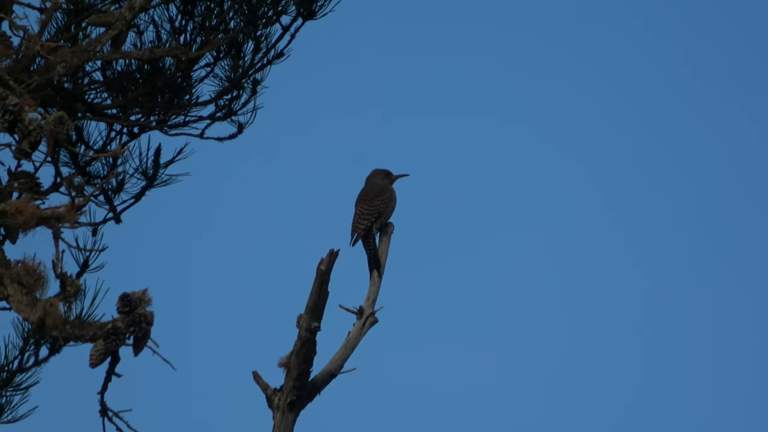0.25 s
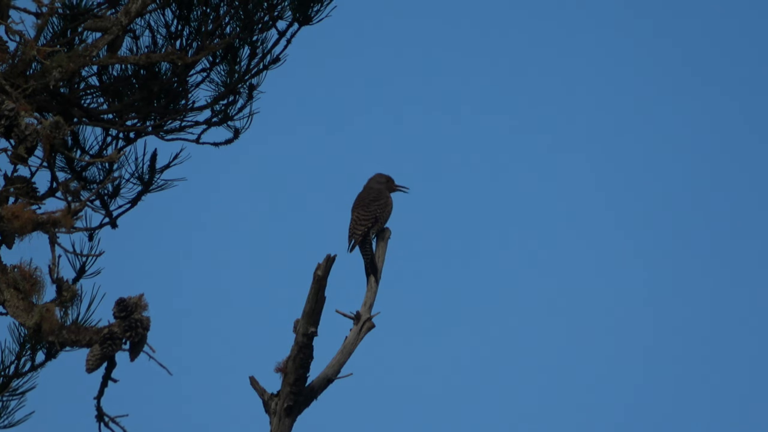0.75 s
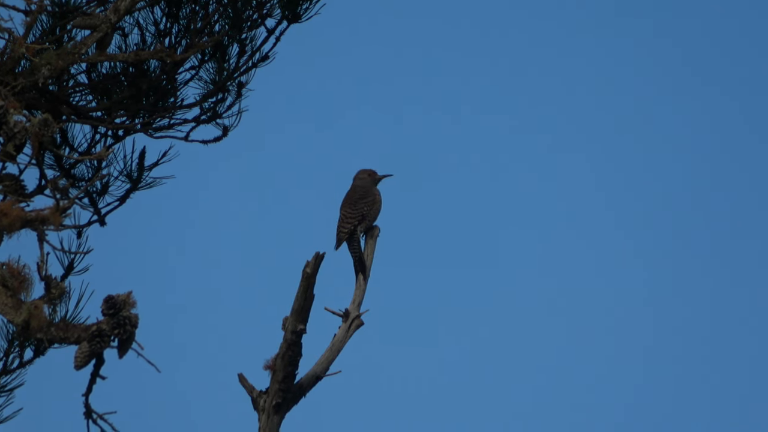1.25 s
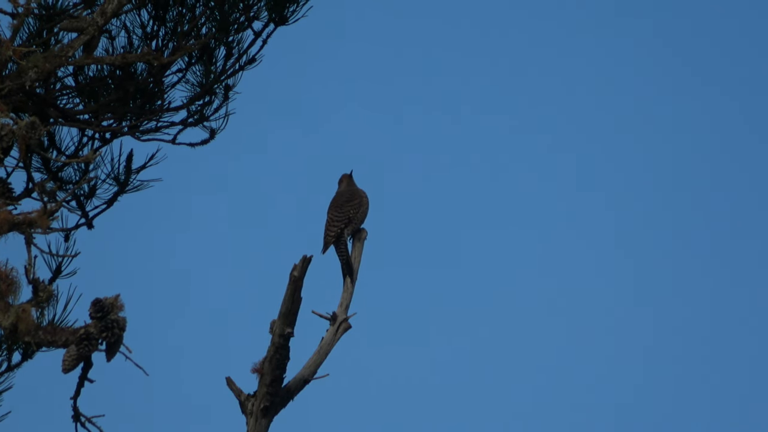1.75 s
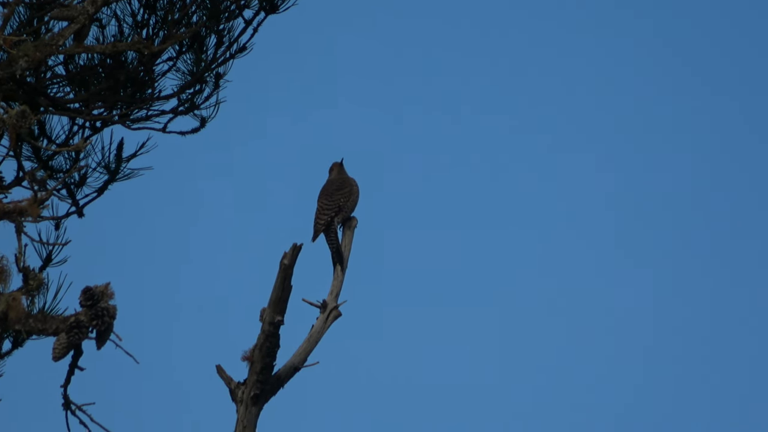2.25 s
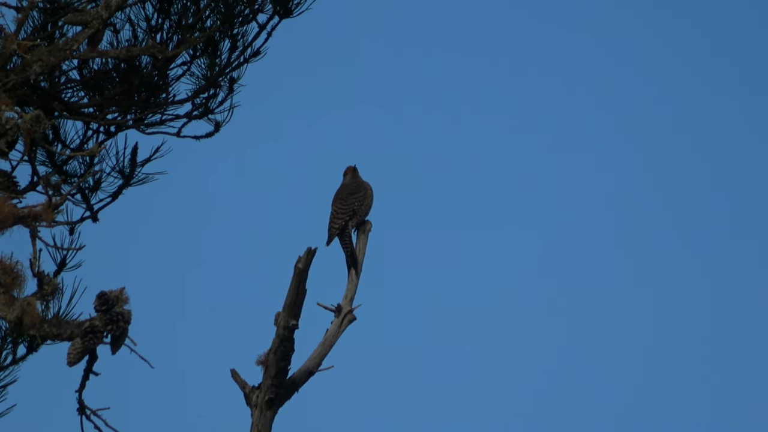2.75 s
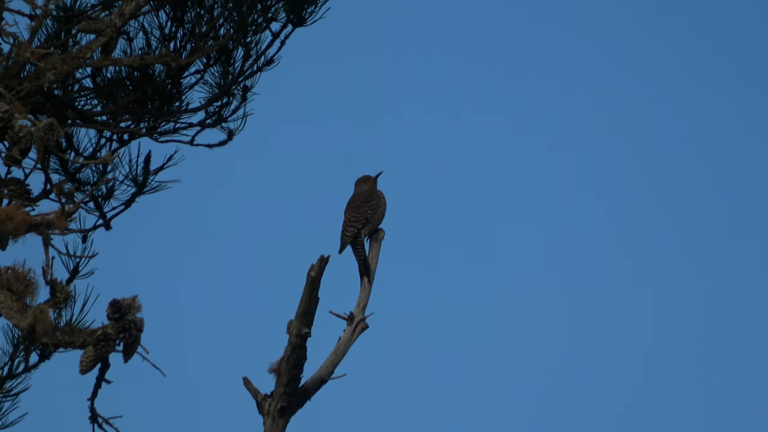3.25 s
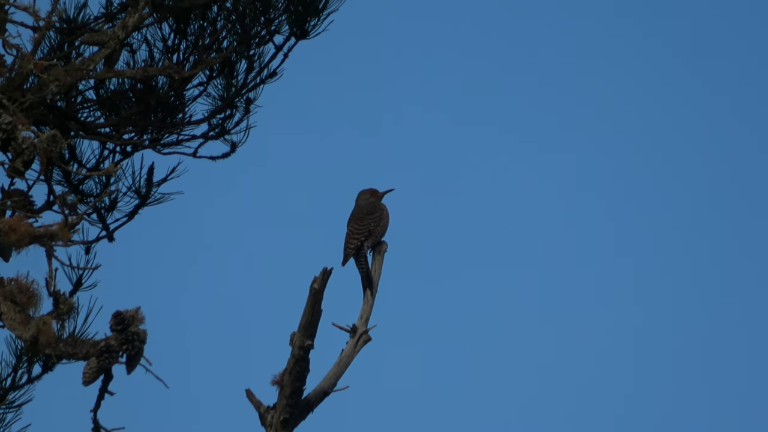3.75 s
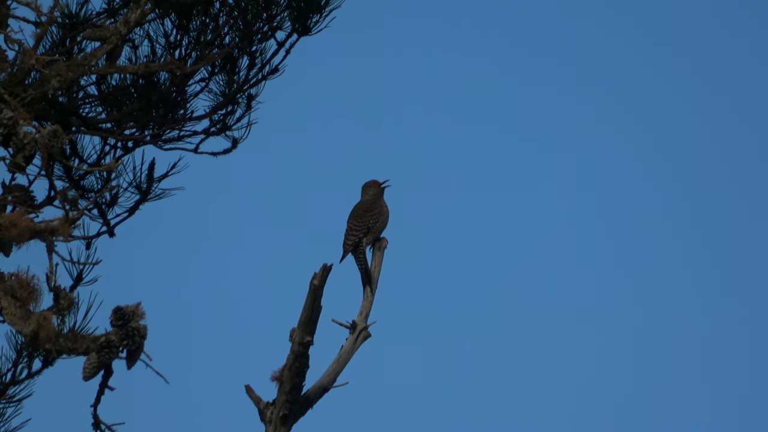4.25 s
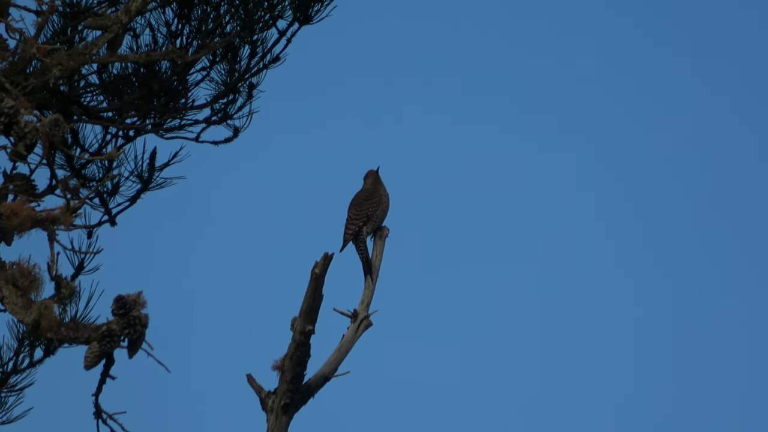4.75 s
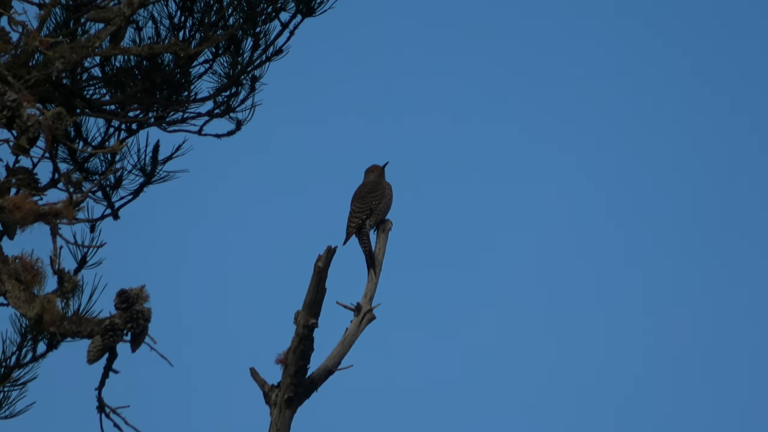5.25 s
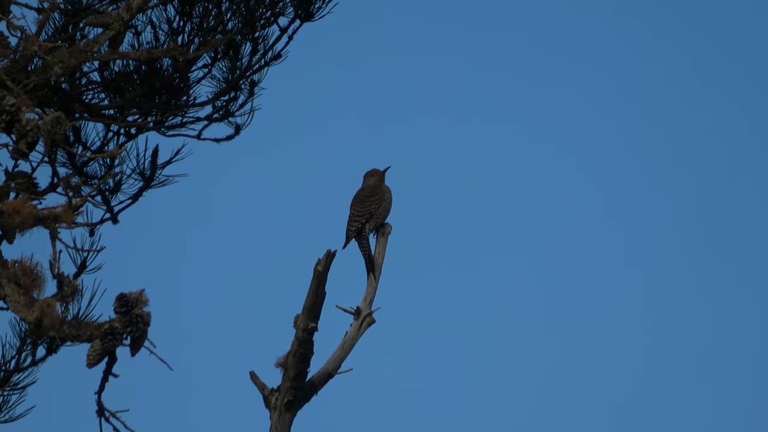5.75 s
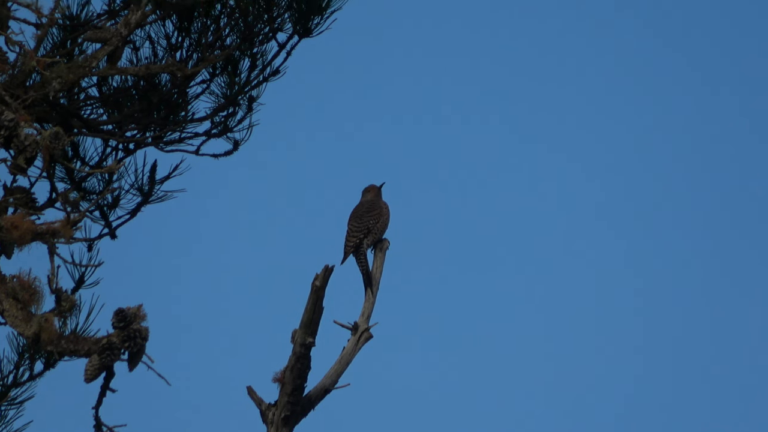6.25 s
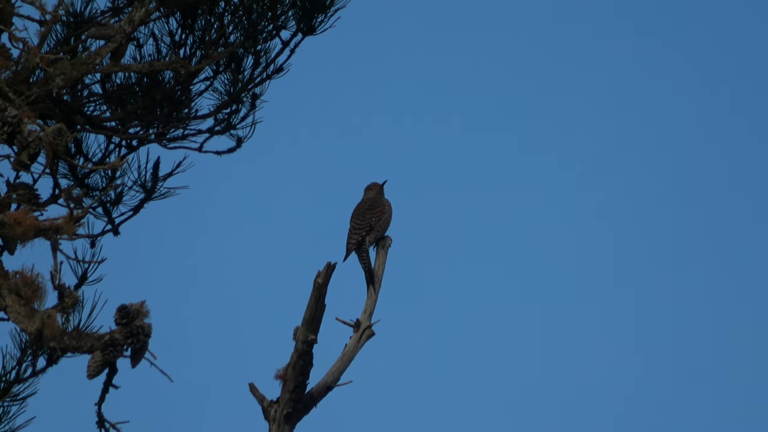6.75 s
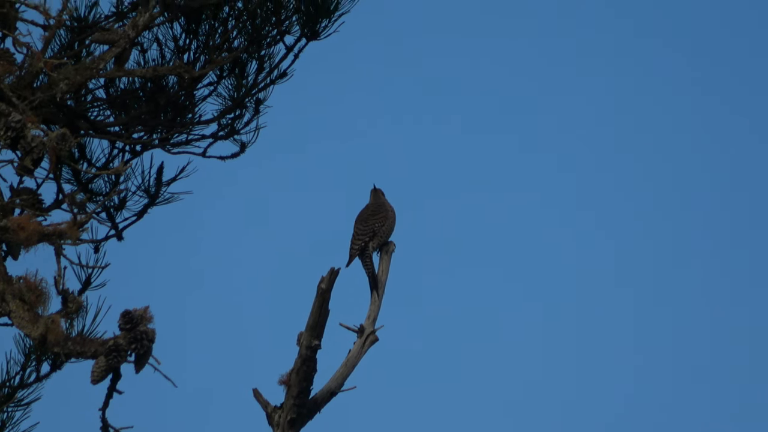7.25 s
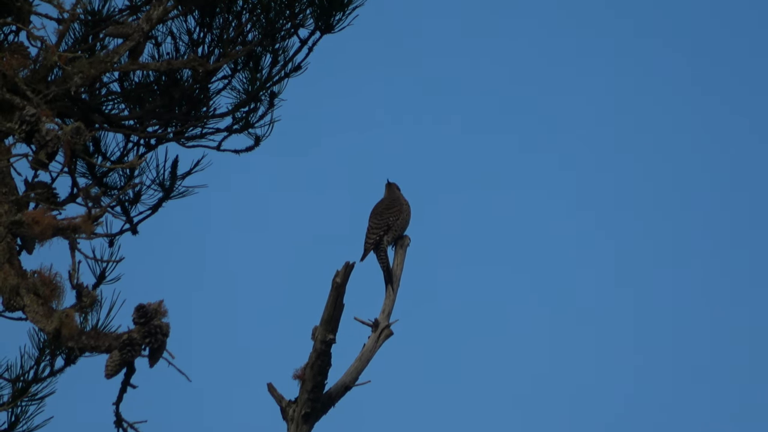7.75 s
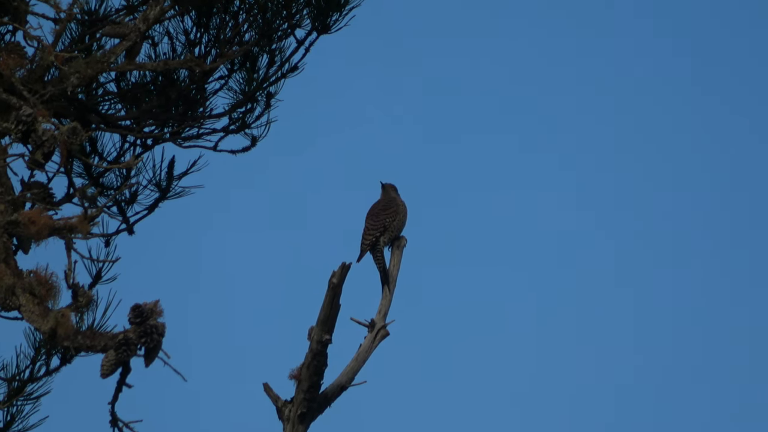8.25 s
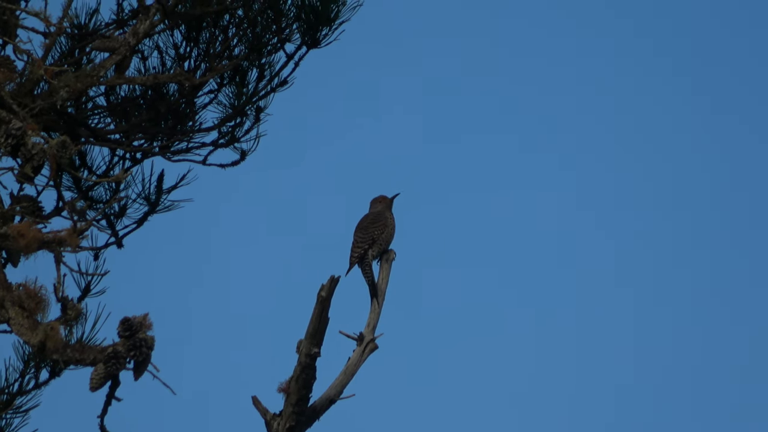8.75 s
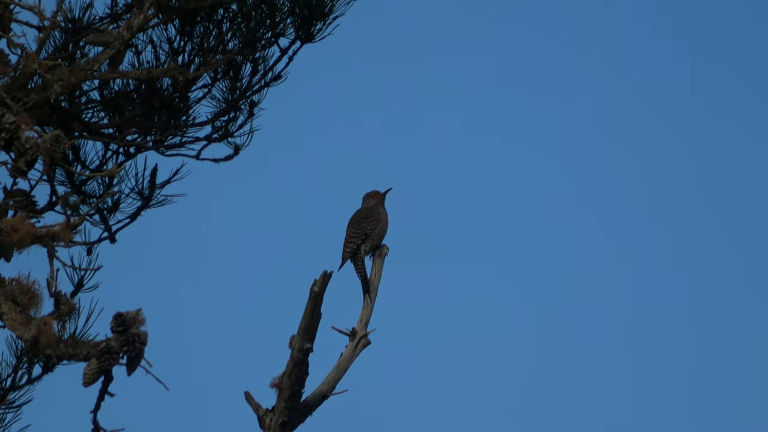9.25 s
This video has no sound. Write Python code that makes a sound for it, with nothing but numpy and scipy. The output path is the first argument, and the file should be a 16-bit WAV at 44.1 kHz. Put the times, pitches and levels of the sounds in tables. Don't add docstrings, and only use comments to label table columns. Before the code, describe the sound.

Quiet woodland edge with distant motor hum and soft hiss, where a young woodpecker repeats sharp notes and falling calls with woody echoes.

```python
import sys
import numpy as np
from scipy import signal
from scipy.fft import rfft, irfft, next_fast_len
from scipy.io import wavfile

SR = 44100
rng = np.random.default_rng(int(sys.argv[2]) if len(sys.argv) > 2 else 0)


def wrap_up_sound(samples):
    columns = np.atleast_2d(samples).T
    tamed = np.clip(columns, -1, 1)
    steps = np.round(tamed * 32767).astype(np.int16)
    wavfile.write(sys.argv[1], SR, steps)


def how_loud(loudness_db):
    steps = np.asarray(loudness_db, float) / 20
    return 10 ** steps


N = 419391

# freq_hz, level_db
THROAT = [(2500, 0), (4200, 17), (5200, 1), (6200, 0), (6900, -1), (7400, -4), (8000, -4), (10000, -4),
          (11500, -13.5), (13000, -16), (16000, -41)]
# time_s, pitch_hz, partial1_db, partial2_db, partial4_db
CHIRP = [(-.023, 2030, -60, -54, -70), (-.014, 1850, -47, -43, -52), (-.006, 2100, -50, -43, -59),
         (.007, 2100, -66, -46, -80)]
# time_s, pitch_hz, partial1_db, partial2_db, partial4_db
WHISTLE = [(0, 2590, -74, -36, -65), (.012, 2540, -92, -35.5, -46.5), (.026, 2445, -60, -35, -45),
           (.04, 2425, -47, -45, -63)]
# time_s, pitch_ratio (to break_hz), partial1_db, partial2_db, partial4_db
VOICE_BREAK = [(.038, 1, -74, -53, -78), (.045, 1, -71, -43, -75), (.053, 1, -75, -48, -80),
               (.058, 1, -70, -53, -80)]
# time_s, pitch_hz, partial1_db, partial2_db, partial4_db
SLUR = [(.055, 2204, -51, -62, -79), (.065, 1995, -43.5, -42, -60), (.076, 1940, -53, -30, -52),
        (.093, 1871, -43.5, -40.5, -57), (.11, 1840, -39, -31, -58.5), (.141, 1709, -54.5, -45, -51),
        (.151, 1421, -47.5, -42.5, -56)]
# whistle_start_s, stretch_ratio, level_db, break_hz, tail_hz
LONG_CALLS = [
    (.939, 1.0, -1, 1815, 1210),
    (4.374, 1.0, 1, 1772, 1205),
    (8.598, .855, -1, 1865, 1395),
]
TAIL_START_S, TAIL_END_S, TAIL_END_HZ = .183, .202, 1170
TAIL_START_DB, TAIL_END_DB = (-56, -48, -63), (-61, -62, -66)
HURRY_LOSS_DB = 50

# time_s, pitch_ratio (to hold_hz), partial1_db, partial2_db, partial4_db
NOTE_START = [(0, .73, -20, -9, -36), (.008, .76, -7, -10.5, -30), (.014, .81, -19.5, 1, -38.5),
              (.022, 0.93, -7, -18, -47)]
# time_s, pitch_ratio (to hold_hz), partial1_db, partial2_db, partial4_db
NOTE_HOLD = [(.019, .985, -32, -10, -30), (.03, 1, -34, -4, -24), (.04, 1.01, -34, 0, -22),
             (.052, 1, -34, -11, -32)]
# time_s, pitch_hz, partial1_db, partial2_db, partial4_db
NOTE_DROP = [(.051, 2420, -12, -16, -38), (.06, 1918, -24, 1, -29), (.066, 1800, -16, -10.5, -34),
             (.072, 1810, -26, -9, -32)]
# start_s, start_db, hold_hz, hold_db, drop_db
SHORT_NOTES = [
    (0.781, -43, 3025, -39.5, -46),
    (2.634, -46.5, 3020, -53.5, -44.5),
    (4.288, -51, 3030, -85, -48),
    (6.713, -50, 2750, -45.5, -48),
]
# time_s, pitch_hz, partial1_db, partial2_db, partial4_db
SLACK_HOLD = [(4.302, 2460, -44, -63, -81), (4.312, 2620, -56, -64, -85), (4.326, 2820, -49, -60, -90),
              (4.336, 2970, -53, -69, -89)]

# time_s, echo_db
TURNED_AWAY = [(.8, -3), (2.7, 1), (4.3, 1), (6.75, 6)]
# freq_hz, t60_s
WOOD_T60 = [(1000, .8), (2500, 1.05), (3800, 1.2), (5000, .72), (6000, .8), (10000, .4)]
LEAF_STIR_RATIO, LEAF_STIR_HZ = .4, 140

# start_s, length_s, low_band_hz, high_band_hz, high_band_db
BUZZES = [
    (0.018, 0.46, 4470, 5800, -4),
    (1.718, .375, 4250, 5800, -9),
]
BUZZ_RATE_HZ, BUZZ_WIDTH_HZ, BUZZ_DEPTH_RATIO = 137, 600, .7
BUZZ_DB, BUZZ_SWELL_DB, BUZZ_ECHO_DB = -63, 3, -3
# centre_s, peak_db, pitch_hz
FAR_PIPS = [
    (7.084, -65, 3410),
    (8.04, -63, 3250),
]

# multiple, level_db
HUM_ORDERS = [(2, -12), (3, -7.5), (4, -12.5), (5, -10.5)]
HUM_HZ, HUM_DB, IN_STEP_S = 69.43, -59, .13
BEAT_HZ, BEAT_SLOWS_HZ_PER_S = 2.68, .155
SECOND_DB, SECOND_GROWS_DB_PER_S, SECOND_OCTAVE_DB = -64, .4, -4
# time_s, pitch_hz, level_db
PASSING = [(4.45, 122.1, -61), (4.75, 146.3, -61), (5.1, 154, -57), (5.5, 157.8, -62), (6.2, 149.6, -62),
           (6.8, 151, -87), (7.6, 153.5, -65.5), (8.4, 151.7, -57)]
PASSING_HALF_DB = -5.5

# freq_hz, density_db_per_hz
RUMBLE = [(20, -14), (40, -11), (100, -10.5), (150, -7.5), (340, -8), (450, -11.5), (700, -7), (850, -14),
          (1120, -22), (1300, -10), (1500, -24.5), (1900, -29.5), (2800, -37), (5000, -47)]
# freq_hz, left_minus_right_db
RUMBLE_BALANCE = [(60, -2.5), (150, -5.5), (380, -4), (700, -4), (2400, -3.5)]
# freq_hz, density_db_per_hz
HISS = [(1760, -31), (3000, -7), (4400, -5), (5000, -4), (5730, 0), (7190, -1), (15000, -5), (15600, -7)]
# freq_hz, likeness_ratio
HISS_LIKENESS = [(3000, .6), (4500, .5), (6800, .2), (12000, .55), (15000, .55)]
RUMBLE_DB, HISS_DB = -50.5, -68.5


def at_hz(points, hz):
    point_hz, value = np.transpose(points)
    return np.interp(np.log(hz + 1), np.log(point_hz), value)


def rms_one(x):
    return x / np.sqrt(np.mean(x ** 2) + 1e-20)


def filtered(x, order, hz, kind):
    return signal.sosfilt(signal.butter(order, hz, kind, fs=SR, output="sos"), x)


def wobble(size, cut_hz):
    return rms_one(filtered(rng.standard_normal(size + SR), 2, cut_hz, "low")[SR:])


def span(rows):
    time_s, *columns = np.transpose(rows)
    n = np.arange(round(time_s[0] * SR), min(round(time_s[-1] * SR), N))
    return n, [np.interp(n / SR, time_s, column) for column in columns]


def placed(pattern, start_s, level_db, stretch=1, pitch=1):
    return np.array(pattern) * [stretch, pitch, 1, 1, 1] + [start_s, 0, level_db, level_db, level_db]


def syllables(tables, rough, odd_db, gain_db):
    out = np.zeros(N)
    for rows in tables:
        n, (hz, first_db, second_db, fourth_db) = span(rows)
        jittered_hz = hz * (1 + .004 * wobble(len(n), 300))
        phase = 2 * np.pi * np.cumsum(jittered_hz) / SR
        tone = how_loud(first_db) * np.sin(phase) + how_loud(second_db) * np.sin(2 * phase)
        odd_loss_db = np.minimum(first_db - second_db + odd_db, 0)
        for k in range(3, 12):
            level_db = fourth_db + at_hz(THROAT, k * hz) - at_hz(THROAT, 4 * hz)
            level_db -= 3.0 * max(k - 5, 0)
            level_db += k % 2 * odd_loss_db
            tone += how_loud(level_db) * np.sin(k * phase) * (k * hz < .45 * SR)
        uneven = np.minimum(rough * (2000 / hz) ** 3, .97)
        tone *= np.sqrt(1 - uneven ** 2) + uneven * wobble(len(n), 700)
        fade = np.clip(np.minimum(n - n[0], n[-1] - n) / (.002 * SR), 0, 1)
        out[n] += np.sqrt(2) * how_loud(gain_db) * tone * fade
    return out


def long_calls():
    chirps, whistles, slurs = [], [], []
    for start_s, stretch, level_db, break_hz, tail_hz in LONG_CALLS:
        tail_db = np.subtract(TAIL_START_DB, HURRY_LOSS_DB * (1 - stretch))
        tail = [(TAIL_START_S, tail_hz, *tail_db), (TAIL_END_S, TAIL_END_HZ, *TAIL_END_DB)]
        chirps.append(placed(CHIRP, start_s, level_db))
        whistles.append(placed(WHISTLE, start_s, level_db, stretch))
        whistles.append(placed(VOICE_BREAK, start_s, level_db, stretch, break_hz))
        slurs.append(placed([*SLUR, *tail], start_s, level_db, stretch))
    out = syllables(chirps, rough=.15, odd_db=8, gain_db=4.5)
    out += syllables(whistles, rough=.12, odd_db=4, gain_db=3.0)
    return out + syllables(slurs, rough=.07, odd_db=9, gain_db=.4)


def short_notes():
    starts, holds, drops = [], [SLACK_HOLD], []
    for start_s, start_db, hold_hz, hold_db, drop_db in SHORT_NOTES:
        starts.append(placed(NOTE_START, start_s, start_db, pitch=hold_hz))
        holds.append(placed(NOTE_HOLD, start_s, hold_db, pitch=hold_hz))
        drops.append(placed(NOTE_DROP, start_s, drop_db))
    out = syllables(starts, rough=1.3, odd_db=6, gain_db=5.0)
    out += syllables(holds, rough=.15, odd_db=0, gain_db=.5)
    return out + syllables(drops, rough=.35, odd_db=8, gain_db=2.5)


def wood_echo(x):
    near_db, far_db, alike, near_t60_s = -9, -7.0, .97, .3
    t = np.arange(2 * SR) / SR
    mid, side = rng.standard_normal((2, 2, len(t)))
    near, far = np.sqrt(alike) * mid[:, None] + np.sqrt(1 - alike) * side[:, None] * [[1], [-1]]
    far = far * (1 - np.exp(-t / .04))
    echo = how_loud(near_db) * near * how_loud(-60 * t / near_t60_s) * np.sqrt(14 / near_t60_s / SR)
    edges_hz = 700 * 2 ** np.arange(0, 4.6, .5)
    for low_hz, high_hz in zip(edges_hz, edges_hz[1:]):
        t60_s = at_hz(WOOD_T60, np.sqrt(low_hz * high_hz))
        band = filtered(far, 2, [low_hz, high_hz], "band")
        echo += how_loud(far_db) * band * how_loud(-60 * t / t60_s) * np.sqrt(14 / SR)
    echo *= np.clip(t / .003 - 1, 0, 1)
    return signal.fftconvolve(x[None], echo, axes=1)[:, :N]


def rasping_bird():
    out = np.zeros(N)
    for start_s, length_s, low_hz, high_hz, high_db in BUZZES:
        t = np.arange(round(length_s * SR)) / SR
        rate_hz = BUZZ_RATE_HZ * (1 + .03 * wobble(len(t), 15))
        beat = np.cos(2 * np.pi * np.cumsum(rate_hz) / SR)
        pulses = rng.standard_normal(len(t)) * (1 + BUZZ_DEPTH_RATIO * beat)
        low, high = [rms_one(signal.lfilter(*signal.iirpeak(hz, hz / BUZZ_WIDTH_HZ, SR), pulses))
                     for hz in (low_hz, high_hz)]
        voice = rms_one(filtered(low + how_loud(high_db) * high, 4, [3600, 7000], "band"))
        swell = how_loud(BUZZ_SWELL_DB * (t / length_s - 2.5))
        fade = np.clip(np.minimum(t / .016, (length_s - t) / .008), 0, 1)
        out[round(start_s * SR):][:len(t)] = how_loud(BUZZ_DB) * voice * swell * fade
    return out


def far_pips():
    out = np.zeros(N)
    half = 441
    t = np.arange(-half, half) / SR
    for centre_s, peak_db, hz in FAR_PIPS:
        pip = np.hanning(2 * half) * np.sin(2 * np.pi * (hz * t + 6000 * t * t))
        out[round(centre_s * SR) - half:][:2 * half] += how_loud(peak_db) * pip
    return out


def motors():
    t = np.arange(N) / SR - IN_STEP_S
    phase = 2 * np.pi * HUM_HZ * t
    second = phase + 2 * np.pi * (BEAT_HZ * t - BEAT_SLOWS_HZ_PER_S * t * t / 2)
    second_tone = np.sin(second) + how_loud(SECOND_OCTAVE_DB) * np.sin(2 * second)
    out = how_loud(HUM_DB) * np.sin(phase) + how_loud(SECOND_DB + SECOND_GROWS_DB_PER_S * t) * second_tone
    for k, order_db in HUM_ORDERS:
        out += how_loud(order_db - 58.0) * wobble(N, 3.3) * np.sin(k * phase)
    return np.sqrt(2) * out


def passing_engine():
    out = np.zeros(N)
    n, (hz, level_db) = span(PASSING)
    phase = 2 * np.pi * np.cumsum(hz) / SR
    tone = np.sin(phase) + how_loud(PASSING_HALF_DB) * np.sin(phase / 2)
    out[n] = np.sqrt(2) * how_loud(level_db) * signal.windows.tukey(len(n), .15) * tone
    return out


def coloured(spectrum, likeness, balance):
    size = next_fast_len(N)
    hz = np.arange(size // 2 + 1) * SR / size
    mid, side = rfft(rng.standard_normal((2, size)))
    alike = np.clip(at_hz(likeness, hz), 0, 1)
    sign = np.array([[1], [-1]])
    both = np.sqrt(1 + alike) * mid + sign * np.sqrt(1 - alike) * side
    both = both * how_loud(sign * at_hz(balance, hz) / 2) * how_loud(at_hz(spectrum, hz))
    return rms_one(irfft(both, size)[:, :N])


def town_rumble():
    return how_loud(RUMBLE_DB) * coloured(RUMBLE, [(60, .94), (200, .97), (2000, .89)], RUMBLE_BALANCE)


def hiss():
    return how_loud(HISS_DB) * coloured(HISS, HISS_LIKENESS, [(3000, -.37), (15000, .49)])


def scene():
    calls, notes, buzz = long_calls(), short_notes() + far_pips(), rasping_bird()
    direct = calls + notes
    treble = filtered(direct, 2, 7000, "high")
    direct = direct * how_loud([[-.5], [.4]]) + .37 * treble * [[-1], [1]]
    direct = direct + buzz * how_loud([[-4], [3]])
    notes_echo_db = np.interp(np.arange(N) / SR, *np.transpose(TURNED_AWAY))
    thrown = calls + how_loud(notes_echo_db) * notes + how_loud(BUZZ_ECHO_DB) * buzz
    stir = np.sqrt(1 - LEAF_STIR_RATIO ** 2) + LEAF_STIR_RATIO * wobble(N, LEAF_STIR_HZ)
    echo = wood_echo(thrown * stir) * how_loud([[-1.5], [1.5]])
    engines = (motors() + passing_engine()) * how_loud([[-1.4], [1.3]])
    return direct + echo + engines + town_rumble() + hiss()


def low_pass(x):
    return signal.sosfilt(signal.butter(12, 15710, fs=SR, output="sos"), x)


def record(dry):
    return low_pass(dry)


dry = scene()
out = record(dry)
wrap_up_sound(out)
```